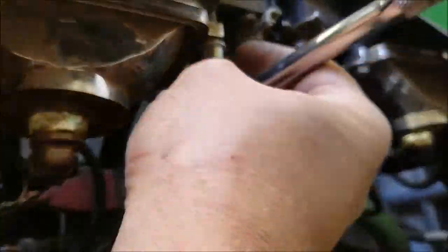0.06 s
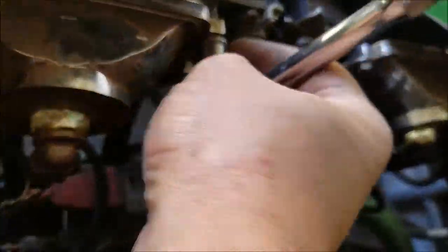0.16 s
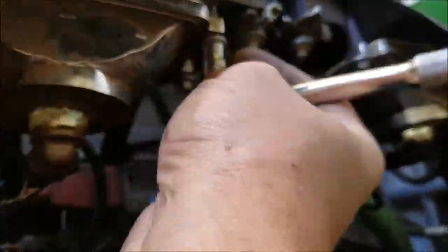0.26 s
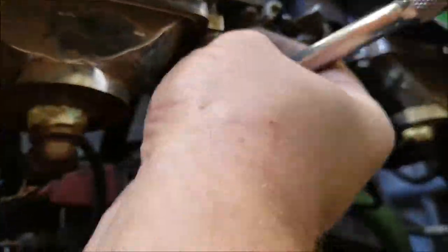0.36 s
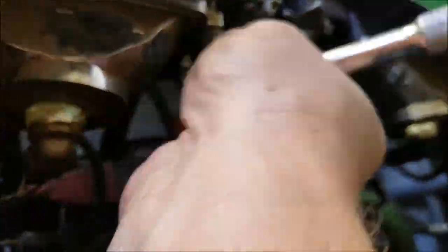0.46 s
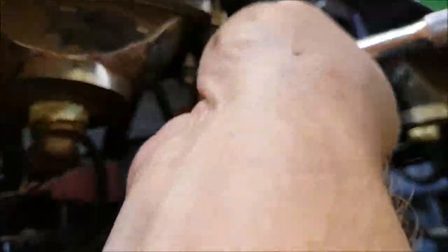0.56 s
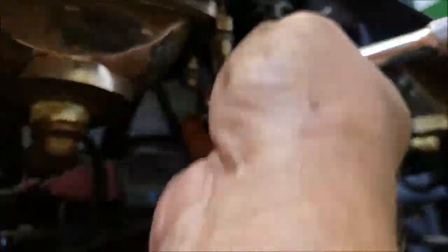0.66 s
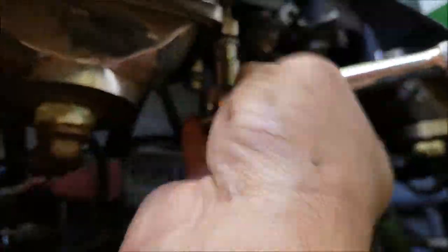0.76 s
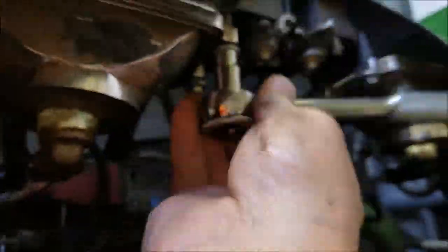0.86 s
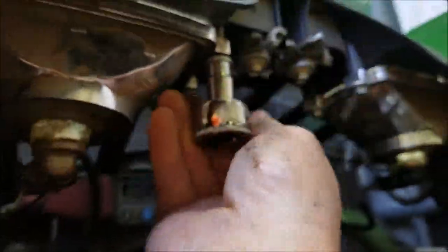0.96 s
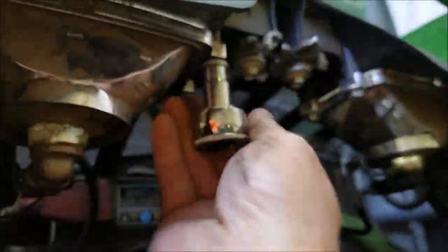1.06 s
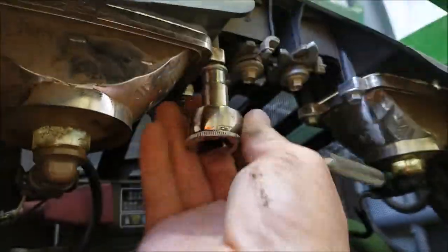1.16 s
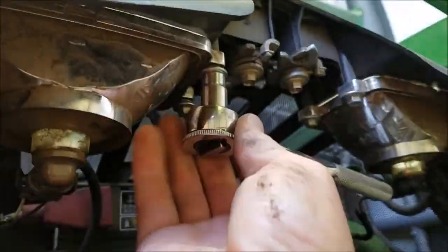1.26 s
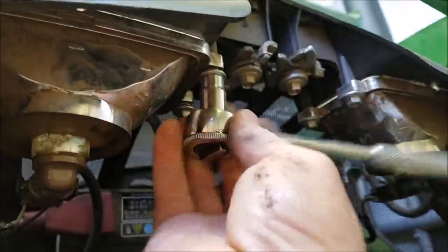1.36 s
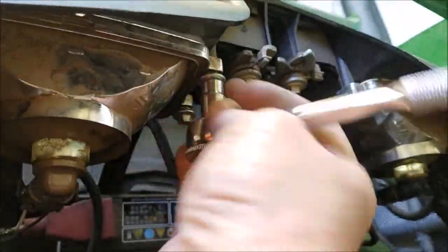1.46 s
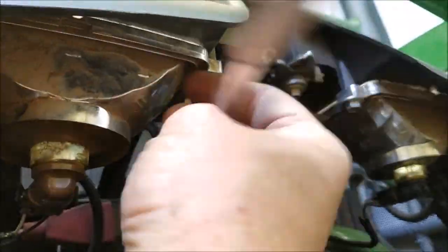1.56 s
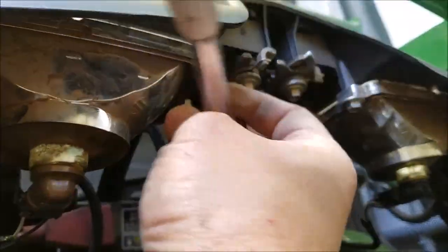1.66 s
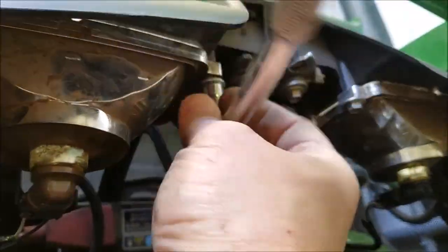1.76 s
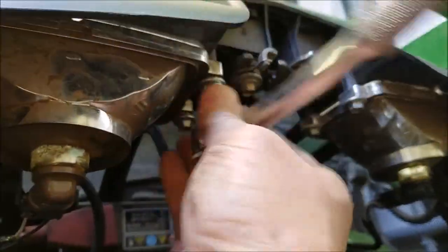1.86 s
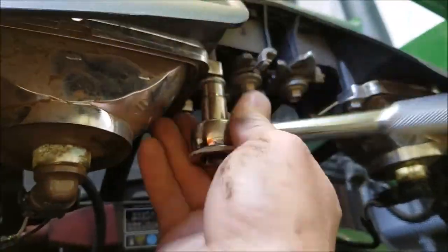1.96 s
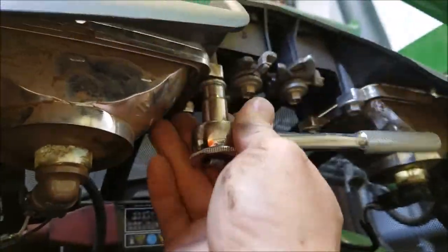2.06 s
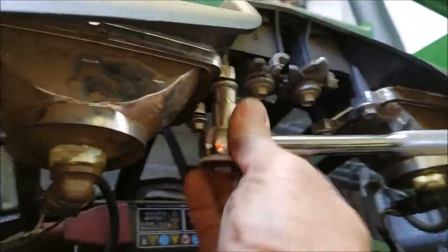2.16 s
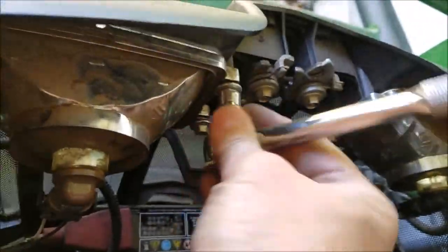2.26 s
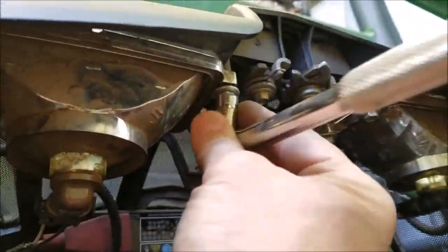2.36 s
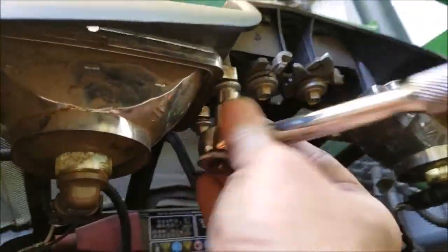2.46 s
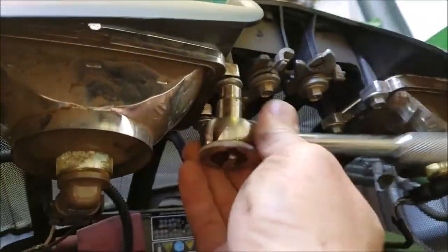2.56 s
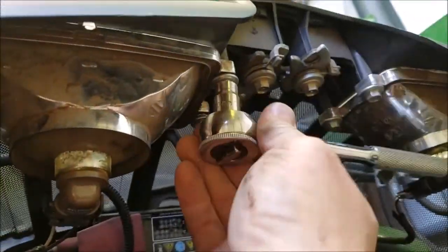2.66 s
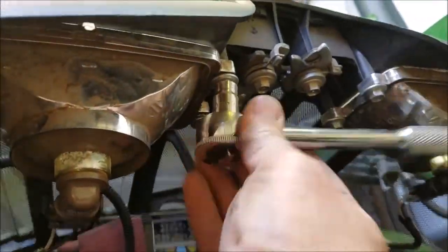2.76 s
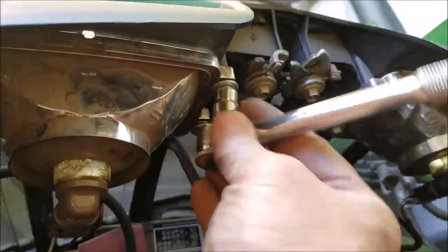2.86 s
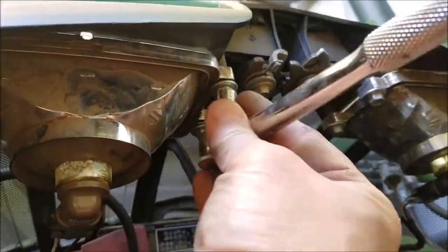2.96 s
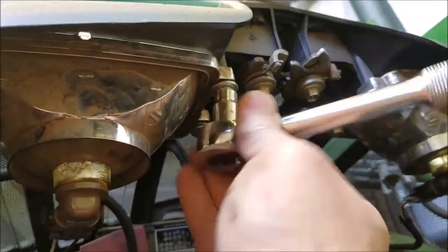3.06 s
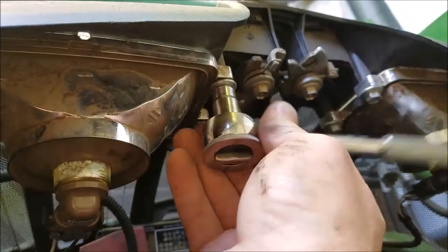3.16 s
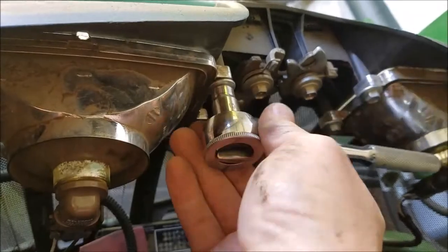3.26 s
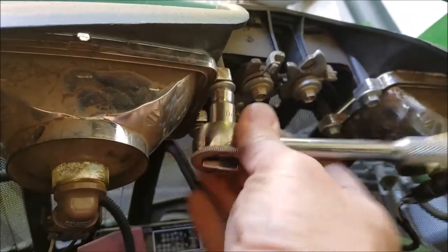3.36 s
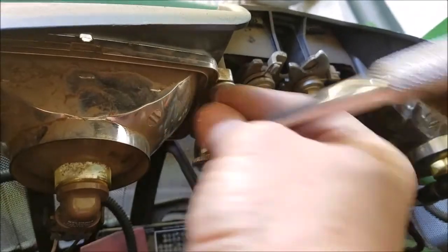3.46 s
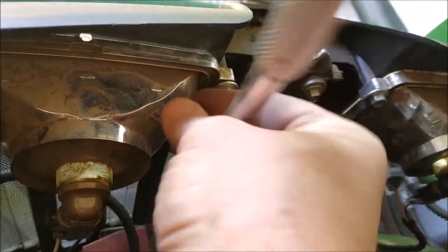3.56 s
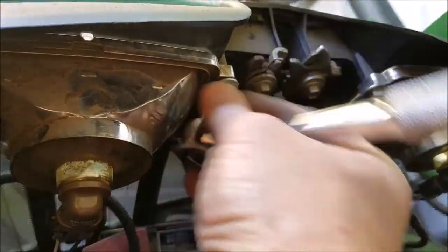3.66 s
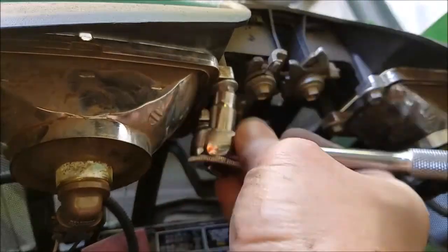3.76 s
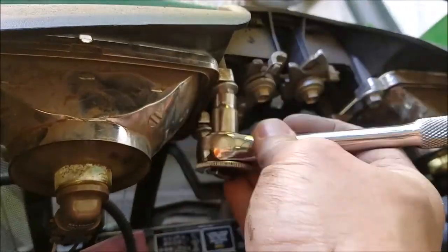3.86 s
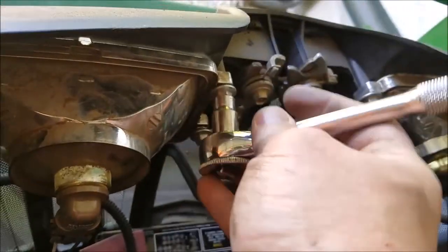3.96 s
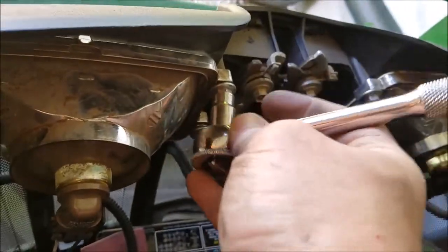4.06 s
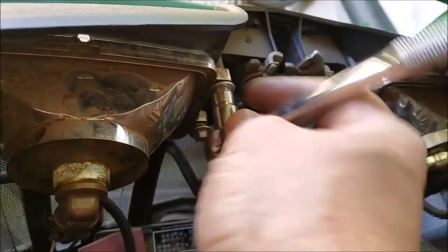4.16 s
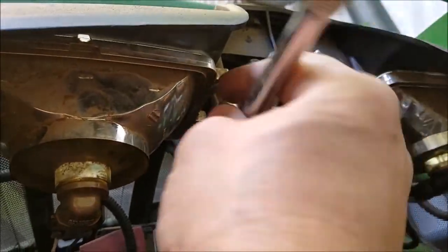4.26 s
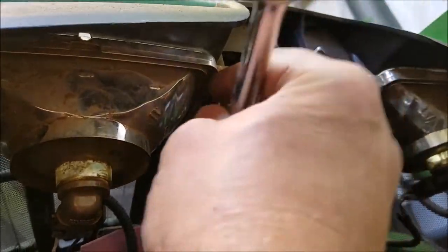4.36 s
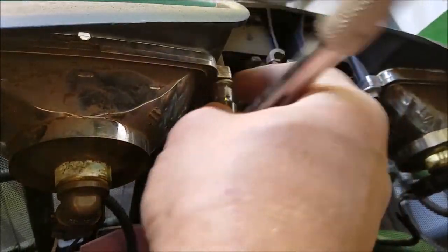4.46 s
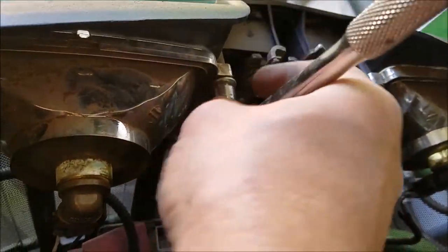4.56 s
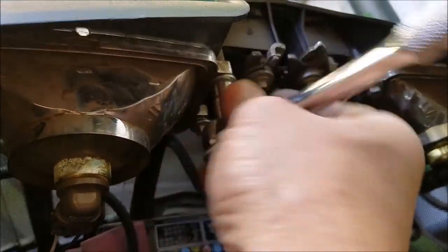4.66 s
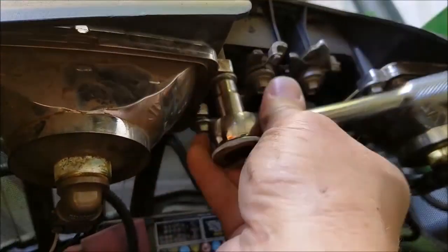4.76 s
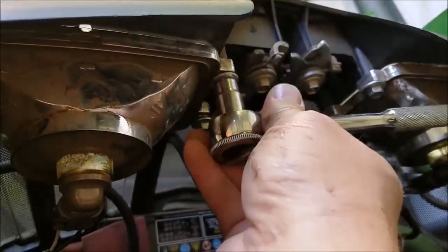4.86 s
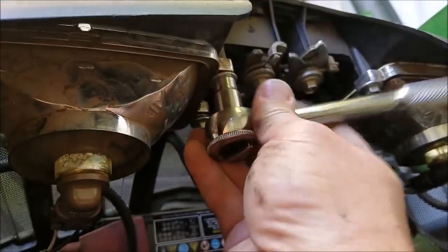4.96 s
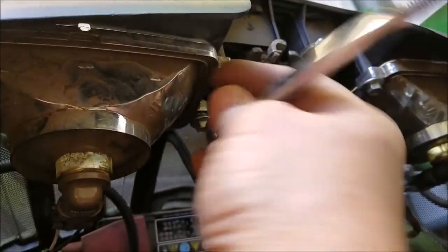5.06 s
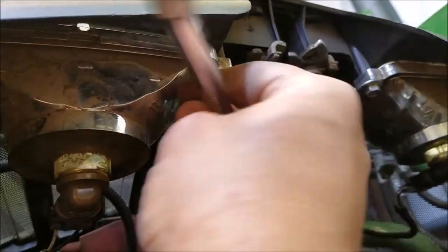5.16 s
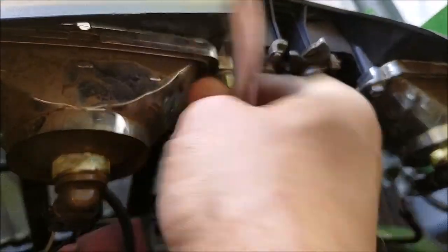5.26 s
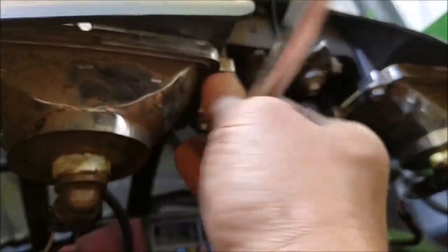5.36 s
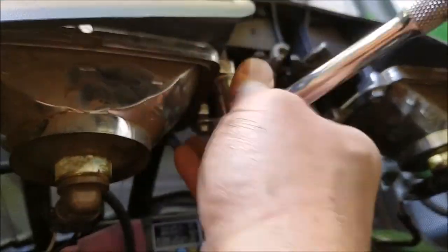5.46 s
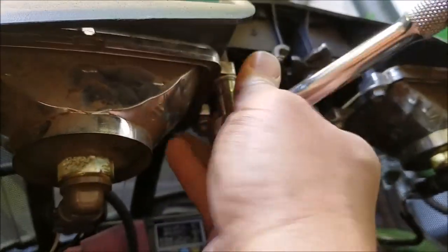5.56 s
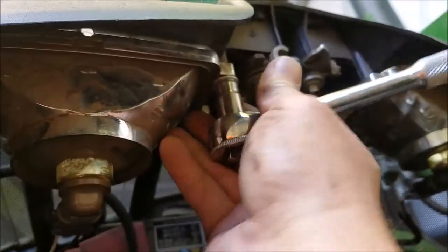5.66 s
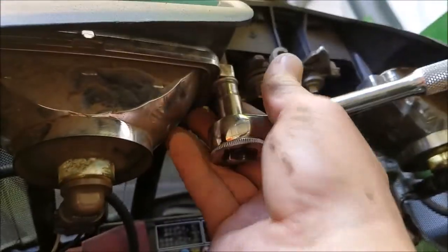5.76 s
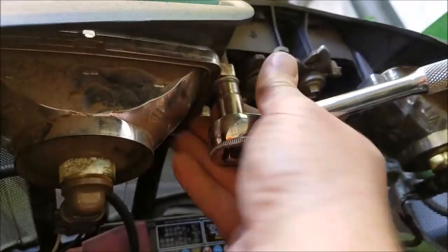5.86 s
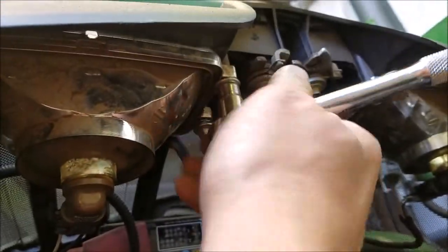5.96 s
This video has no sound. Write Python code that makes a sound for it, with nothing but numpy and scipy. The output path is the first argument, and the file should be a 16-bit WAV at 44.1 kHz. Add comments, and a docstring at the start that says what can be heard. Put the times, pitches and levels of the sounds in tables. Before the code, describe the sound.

A hand ratchet with a socket works on a machine bolt, very close to a stereo microphone in a workshop with short reverberation. Near 0.1 s the tool's slack knocks lightly and skin rubs. Two hard clunks with a low housing thud land at 0.6 and 0.8 s, the second with a short handle ring, followed by a few separate clicks. Six rapid runs of crisp steel clicks, with rattle and chatter, occur at 1.0-1.25, 1.9-2.0, 2.45-2.6, 3.05-3.2, 3.85-3.95 and 4.7-4.9 s; isolated clicks appear around 3.6 and 4 s. Soft knocks and uneven hand slides surround them. A tiny squeak comes at 2.8 s. Low rumble and faint hiss persist; a wavering low motor hum swells from about 2 s and weakens after 3.6 s. After the last run only small knocks and dry rubbing continue to 6 s.

```python
"""A socket ratchet works on a bolt in a machine, close to the microphone in a workshop.
First the slack of the tool knocks and the hand rubs the handle; then the socket clunks onto the bolt, twice.
Six back-swings follow: the pawl drops over the teeth in runs of clicks, each a burst of filtered noise
plus decaying modes. Knocks and hand slides (gliding noise) continue around the runs and after the last.
A motor hum, a wavering sine, swells from about 2 s; the thread squeaks once, before the fourth swing."""
import sys
import numpy as np
from scipy import signal
from scipy.fft import rfft, irfft
from scipy.io import wavfile
from scipy.ndimage import uniform_filter1d

SR = 44100
rng = np.random.default_rng(int(sys.argv[2]) if len(sys.argv) > 2 else 0)


def to_wav(sig):
    """Store sig (one row per channel, or 1-D mono) as 16-bit WAV at the path in sys.argv[1].

    Samples outside -1..1 are clipped; the rate is SR.
    """
    pcm = np.clip(np.atleast_2d(sig), -1, 1) * 32767
    pcm = np.round(pcm).astype(np.int16)
    wavfile.write(sys.argv[1], SR, pcm.T)  # frames by channels


N = 265614
FREQ_HZ = np.fft.rfftfreq(N, 1 / SR)
TIME_S = np.arange(N) / SR

# Spectra of click, shank rattle, machine kick: f/Hz, relative level/dB
STEEL_SPECTRUM = [(2000, -42.5), (5000, -18), (6500, -15.5), (7400, -27.5), (8800, -17), (11000, -12),
                  (13200, -10.5), (15700, -11), (17000, -16)]
SHANK_SPECTRUM = [(700, -23), (2000, -2), (3000, -10), (3550, 2.5), (4500, -2), (5500, -4.5), (7500, -5),
                  (11000, -17.5)]
MACHINE_SPECTRUM = [(60, -9.5), (130, -17), (200, 0), (340, -10.5), (470, 1), (620, -10.5), (1000, -4),
                    (1900, -16), (2600, -5.5), (4000, -27), (8000, -19.5)]
# Resonances of the ratchet head: f/Hz, width/Hz, level above the rest/dB
HEAD_MODES = [(7960, 206, 21.5), (8570, 270, 11.5), (9700, 1400, 10), (12020, 610, 14), (12360, 1700, 6.5),
              (14630, 400, 15.5)]


def pawl():
    """The pawl snaps down at each main click: head rings, shank rattles, socket sings, machine is kicked."""
    s, click_db, *relative_db = clicks_in_order().T
    shank_db, hollow_db, socket_db = click_db + np.array(relative_db)

    # chatter on the flank of the next tooth, weaker where the gap exceeds 20 ms
    gap_s = np.diff(s, append=np.inf)
    place, luck = rng.random((2, len(s)))
    late_s = s + np.minimum(gap_s, 0.016) * (0.3 + 0.5 * place)
    chatter_db = np.minimum(shank_db - click_db + 8, -5) - 6 * luck - 12 * (gap_s > 0.02)

    snap = blows(s, click_db, t60_s=0.029, rise_s=0.0004, repeat=0.15, patchy_db=3.5)
    snap += blows(late_s, click_db + chatter_db, t60_s=0.03, rise_s=0.0004, repeat=0.06, patchy_db=5)
    rattle = blows(s, shank_db - 1.5, t60_s=0.051, rise_s=0.00035, repeat=0.062, patchy_db=5)
    rattle += blows(late_s, shank_db + chatter_db + 3.5, t60_s=0.036, rise_s=0.0004,
                    repeat=0.04, patchy_db=4.5)
    kick = blows(s, shank_db - 4.5, t60_s=0.092, rise_s=0.0014, repeat=0.41, patchy_db=2)
    hollow = ring(s, hollow_db - 1, hz=462, t60_s=0.07, spread=0.035)
    socket = ring(s, socket_db - 2, hz=4125, t60_s=0.042, spread=0.017)

    noise = colour(snap, STEEL_SPECTRUM, HEAD_MODES)
    noise += colour(rattle, SHANK_SPECTRUM)
    noise += colour(kick, MACHINE_SPECTRUM)
    return ports(noise) + hollow + socket * amp([[2.5], [-5]])  # socket: left, right dB


SOCKET_HELD_DB = -18  # socket ring rel. to click under a damping grip, before scatter and trim
# One row a back-swing: start t/s, end t/s, main clicks in the run (with chatter between them),
# ease (slowing at both ends, 0-1), lean (start slower than end),
# limp (every second main click late, share of the pitch),
# click level/dB; rel. to click: shank rattle level/dB, hollow note level/dB, socket ring level/dB;
# freest socket ring t/s. Levels before scatter and the trims in pawl().
BACK_SWINGS = [(1.0307, 1.2503, 21, 0.42, -0.28, 0.1, -16.5, -10.5, -11.5, 3, 1.21),
               (1.8762, 2.0263, 14, 0.17, -0.13, .22, -15.5, -13, -16, -6.5, 1.965),
               (2.4484, 2.618, 15, 0.1, -0.038, 0.08, -15.5, -13, -15.5, -5, 2.61),
               (3.0489, 3.195, 12, .045, .257, .066, -13.5, -10.5, -35, 2, 3.14),
               (3.8436, 3.9448, 9, .22, -.085, .125, -16.5, -14.5, -23, -8, 3.89),
               (4.7012, 4.874, 14, 0.3, -0.049, -.03, -13.5, -12, -26, -6, 4.785)]
# Teeth outside the regular part of a run: some stand alone, some open or close the first back-swing:
# t/s, click level/dB, shank rattle level rel. to click/dB; before the trims in pawl()
OUTER_TEETH = [(0.8082, -17, -5), (0.8377, -16.5, -12.5), (.863, -17.5, -7.5), (0.9719, -17.5, -16.5),
               (1.0154, -19, -10.5), (1.2622, -10.5, -15.5), (1.278, -23.5, -5), (2.0576, -16, -15),
               (3.6233, -20, -7.5), (3.6731, -15, -20), (3.971, -14, -10.5), (3.9959, -13.5, -20.5),
               (4.0662, -18, -13)]


def clicks_in_order():
    """Main clicks of the pawl, inside and outside the regular part of the runs, sorted by time."""
    hollow_db = -24.5  # of the outer teeth, rel. to click, before trim
    outer = [(*row, hollow_db, SOCKET_HELD_DB) for row in OUTER_TEETH]
    rows = np.vstack([swing(*row) for row in BACK_SWINGS] + [outer])
    return rows[np.argsort(rows[:, 0])]


def swing(start_s, end_s, main_clicks, ease, lean, limp, click_db, rattle_db, hollow_db, ring_db, ring_s):
    """Uneven handle speed spaces the main clicks: rows t/s, click dB, rel. rattle, hollow, socket dB."""
    ends_db, click_scatter_db = -0.5, 1.73  # softer clicks at both ends; no two alike
    free_s, ring_scatter_db = 0.047, 2.5  # the grip frees the socket for a moment in each swing
    count = round(main_clicks)
    k = np.arange(count)
    angle = (k + limp * (k % 2) * (k < count - 1)) / (count - 1)
    when = angle + ease * np.sin(2 * np.pi * angle) / (2 * np.pi)
    when += lean * np.sin(np.pi * angle) / np.pi
    s = start_s + (end_s - start_s) * when
    tooth, contact = rng.standard_normal((count, 2)).T
    level_db = click_db + ends_db * (2 * angle - 1) ** 2 + click_scatter_db * tooth
    free = np.exp(-0.5 * ((s - ring_s) / free_s) ** 2)
    socket_db = SOCKET_HELD_DB + (ring_db - SOCKET_HELD_DB) * free + ring_scatter_db * contact
    return np.column_stack(np.broadcast_arrays(s, level_db, rattle_db, hollow_db, socket_db))


# Spectra of the clack (also of the knocks) and of the thud: f/Hz, relative level/dB
CLACK_SPECTRUM = [(350, -27.5), (700, 0), (1200, -4), (1650, 0), (2900, -3), (4200, -9), (6000, -21.5),
                  (16000, -40)]
THUD_SPECTRUM = [(40, -23.5), (100, -16), (180, 1), (290, -6.5), (460, -0.5), (640, -10), (3000, -48)]
# Low modes of the machine under a hard blow: f/Hz, level rel. to thud entry/dB, t60/s
HOUSING_MODES = [(198.3, -9.5, .2), (313, -4.5, 0.087), (368, -1, 0.089), (463.4, 0, 0.068)]
# Socket seats hard on the bolt: t/s, clack level/dB, thud level/dB, snap level/dB,
# handle ring level/dB; before the trims below
SOCKET_CLUNKS = [(0.583, -12.5, -12.5, -9, -45.5), (0.7711, -12.5, -12, -18, -13.5)]


def clunks():
    """The socket lands on the bolt: snap, clack, thud of the housing, short note of the handle."""
    s, clack_db, thud_db, snap_db, ring_db = np.transpose(SOCKET_CLUNKS)
    snap_spectrum = [(1500, -28), (4200, 3), (15500, -1)]
    clack = blows(s, clack_db, t60_s=0.06, rise_s=0.0008, repeat=0.25, patchy_db=3.5)
    thud = blows(s, thud_db - 5, t60_s=0.1, rise_s=0.0026, repeat=0.15, patchy_db=1)
    snap = blows(s, snap_db, t60_s=0.029, rise_s=0.0006, repeat=0.1, patchy_db=1.5)
    noise = colour(clack, CLACK_SPECTRUM) + colour(thud, THUD_SPECTRUM) + colour(snap, snap_spectrum)

    housing = sum(ring(s, thud_db + db, hz, t60_s, spread=0.021, rise_s=0.0018)
                  for hz, db, t60_s in HOUSING_MODES)
    # the housing rocks back 35 ms later
    housing += ring(s + 0.035, thud_db - 14.5, hz=163, t60_s=0.13, spread=0.019, rise_s=0.005)
    handle = ring(s, ring_db, hz=1648, t60_s=0.13, spread=0.003)
    handle += ring(s, ring_db - 2, hz=1936, t60_s=0.08, spread=0.004)
    # handle: left +2 dB, right inverted at half amplitude
    return ports(noise) + housing + handle * amp([[2], [0]]) * [[1], [-0.5]]


# Spectrum of the snap: f/Hz, relative level/dB
SNAP_SPECTRUM = [(1500, -29.5), (4000, 5.5), (6500, -1), (9000, -3), (15500, 1.5)]
# Slack of the tool is taken up: t/s, clack level/dB, thud level rel. to clack/dB,
# snap level rel. to clack/dB; before the trims below
SLACK_KNOCKS = [(0.074, -30, -6, -5), (0.1, -20, -7.5, -21), (0.117, -25.5, -5.5, -7),
                (0.396, -41, -4, -13), (1.363, -34.5, -3, -10), (1.411, -44.5, 4, 11),
                (1.86, -28.5, -6.5, -1), (2.122, -38.5, 4, -23), (2.696, -27, -3.5, 0.5),
                (3.025, -30.5, -2.5, -1.5), (3.288, -30.5, -17.5, -43), (3.365, -51, -2.5, 22),
                (3.4043, -37, 3.5, -22.5), (3.458, -43.5, 2, -19), (3.475, -34.5, -0.5, 8),
                (4.144, -30, -4, -11.5), (4.569, -50.5, -19, 19.5), (4.677, -23.5, -5, -3.5),
                (4.918, -25.5, -8.5, -18.5), (4.953, -37.5, -4, 5), (5.06, -33.5, -6.5, -4),
                (5.098, -51, -15, 21.5), (5.639, -47, -6, 6), (5.692, -28, -4, -31),
                (5.888, -37.5, -1, -22)]


def knocks():
    """Softer blows as the handle changes direction and the socket rocks on the bolt."""
    s, db, thud_db, snap_db = np.transpose(SLACK_KNOCKS)
    clack = blows(s, db - 1.5, t60_s=0.058, rise_s=0.0004, repeat=0.1, patchy_db=2.5)
    thud = blows(s, db + thud_db, t60_s=0.12, rise_s=0.004, repeat=0.05, patchy_db=2.5)
    snap = blows(s, db + snap_db - 6, t60_s=0.04, rise_s=0.0007, repeat=0.14, patchy_db=7)
    noise = colour(clack, CLACK_SPECTRUM) + colour(thud, THUD_SPECTRUM) + colour(snap, SNAP_SPECTRUM)
    return ports(noise)


# Spectra of the skin rub and of dry skin on knurled steel: f/Hz, relative level/dB
SKIN_SPECTRUM = [(60, 3), (170, 10.5), (320, 2.5), (450, 5.5), (700, -0.5), (1500, -1.5), (3500, -16),
                 (6000, -23.5), (9000, -28.5), (15500, -19)]
HISS_SPECTRUM = [(1000, 29), (2800, 3.5), (4500, 3), (7500, -13.5), (12000, -5.5), (16000, -27)]


def rub():
    """Skin and threads slide unevenly, with tiny slips; the colour shifts as the contact moves."""
    slips_per_s, slip_decay_s = 60, 0.0022
    slip_size = amp(4 * np.minimum(rng.exponential(1, N), 2.5))
    slips = (rng.random(N) < slips_per_s / SR) * slip_size
    slips = signal.lfilter([1], [1, -np.exp(-1 / (slip_decay_s * SR))], slips)
    roughness = amp(2 * drift(15)) + 0.61 * unit(slips)
    z = signal.stft(rng.standard_normal((2, N)) * roughness, nperseg=512)[2]

    # level patches, smoothed over frequency, then over time
    patches = uniform_filter1d(rng.standard_normal(z.shape[1:]), size=9, axis=0)
    patches = uniform_filter1d(patches, size=22, axis=1)
    grain = unit(signal.istft(z * amp(3.1 * unit(patches)), nperseg=512)[1][:, :N])
    soft, dry_hiss = handling()
    return ports(colour(grain * soft, SKIN_SPECTRUM) + colour(grain * dry_hiss, HISS_SPECTRUM))


# Hand slides to a new hold: start t/s, end t/s, rub level/dB, dry hiss level rel. to rub/dB
HAND_SLIDES = [(-.03, 0.034, -41, -46), (0.11, 0.293, -49.5, -22), (0.363, 0.523, -63.5, -12),
               (0.854, .99, -64, -19), (1.28, 1.54, -51, -34), (1.589, 1.97, -49, -35),
               (2.044, 2.219, -43.5, -38), (2.325, 2.477, -47.5, -31), (2.59, 2.96, -48, -16),
               (2.957, 3.112, -40.5, -19), (3.15, 3.485, -43.5, -32), (3.536, 3.805, -56, -15),
               (4.03, 4.227, -48.5, -7), (4.35, 4.55, -62.5, -2.5), (4.599, 4.684, -45.5, -38),
               (4.89, 5.027, -40.5, -7.5), (5.02, 5.19, -57, -5), (5.286, 5.48, -61, -1.5),
               (5.589, 5.73, -49.5, -10), (5.879, 5.996, -52.5, -6)]


def handling():
    """Each slide swells and fades in one arch: strength of the rub and of the hiss over time."""
    hold_db, arch_power = -57.5, 0.76  # rub of a hand that only holds on; below 1 = rounder arch
    soft_power, dry_power = np.full(N, amp(hold_db) ** 2), np.zeros(N)
    for start_s, end_s, db, hiss_db in HAND_SLIDES:
        during = (TIME_S > start_s) & (TIME_S < end_s)
        phase = np.pi * (TIME_S[during] - start_s) / (end_s - start_s)
        arch = abs(np.sin(phase)) ** arch_power
        soft_power[during] += (amp(db) * arch) ** 2
        dry_power[during] += (amp(db + hiss_db) * arch) ** 2
    return np.sqrt(soft_power), np.sqrt(dry_power)


def squeak():
    """The thread squeaks once under load: one short, faint decaying tone."""
    return ring([2.773], [-36.5], hz=2190, t60_s=0.043, spread=0.005, rise_s=0.0033)


# Spectrum of rumble and hiss: f/Hz, relative level/dB
AIR_SPECTRUM = [(12, -36), (20, 3.5), (130, 3.5), (228, -15), (446, -23.5), (642, -34.5), (2600, -17),
                (7520, -32), (14700, -30), (16000, -37)]
# Hum of the motor, before its wavering: t/s, level/dB
HUM_LEVEL = [(1.7, -66), (2.3, -49.5), (2.8, -49), (3.6, -49.5), (4.5, -57.5)]


def workshop():
    """Low rumble and faint hiss, with the hum of a distant motor, wavering in pitch and level."""
    noise = rng.standard_normal((2, N)) * amp(drift(3))
    air = unit(ports(colour(noise, AIR_SPECTRUM)))
    hum_hz = 68 + 1.4 * drift(3.5)
    hum_db = np.interp(TIME_S, *np.transpose(HUM_LEVEL)) + 5 * drift(10)
    return amp(-54.5) * air + amp(hum_db) * np.sin(2 * np.pi * np.cumsum(hum_hz) / SR)


# Reverberation of the workshop: f/Hz, t60/s
ROOM_DECAY = [(150, 0.47), (1500, 0.28), (6000, 0.24), (15000, 0.2)]


def room(x):
    """Scattered reflections off the machine and the walls, each band dying at its own speed."""
    build_up_s = 0.0058
    hz, t, z = signal.stft(rng.standard_normal((2, SR // 2)), SR, nperseg=256)
    decay = np.exp(-np.log(1000) * t / read(ROOM_DECAY, hz)[:, None])
    tail = signal.istft(z * decay, SR, nperseg=256)[1]
    tail = tail * (1 - np.exp(-np.arange(tail.shape[1]) / (build_up_s * SR)))
    return signal.fftconvolve(x, tail / np.linalg.norm(tail[0]), axes=1)[:, :N]


# The two microphone ports: f/Hz, left-right level/dB
PORT_BALANCE = [(200, -1), (500, 0.7), (900, 3.5), (2200, 6.5), (3500, 4), (4600, 6.5), (6200, -1.5),
                (9500, -0.5), (11500, -3.5), (14500, -6)]
# Likeness of the two ports: f/Hz, correlation (-1 to 1)
PORT_LIKENESS = [(40, 0.67), (150, 0.98), (450, 0.61), (750, 0.57), (1500, -0.5), (3000, -0.055)]


def ports(x):
    """Mixes two noises to a likeness per frequency; the hand shades mids on one side, treble on the other."""
    a, b = rfft(x)
    alike = np.clip(read(PORT_LIKENESS, FREQ_HZ), -1, 1)
    tilt = amp(read(PORT_BALANCE, FREQ_HZ) / 2)
    left = a * tilt
    right = (alike * a + np.sqrt(1 - alike ** 2) * b) / tilt
    return irfft(np.array([left, right]), N)


def blows(times_s, levels_db, t60_s, rise_s, repeat, patchy_db, size=8192):
    """Each blow is a dense, dying noise: a share repeats, the rest and its colour change with the contact."""
    out, t = np.zeros((2, N)), np.arange(size) / SR
    same, share = rng.standard_normal((2, size)), np.clip(repeat, 0, 1)
    shape = unit((1 - np.exp(-t / rise_s)) * np.exp(-np.log(1000) * t / t60_s))
    shape *= np.sqrt(t60_s * SR / size / np.log(1e6))  # energy grows with t60
    for s, db in zip(times_s, levels_db):
        shake = np.sqrt(share) * same + np.sqrt(1 - share) * rng.standard_normal((2, size))
        patches = signal.resample(rng.standard_normal(size // 128), size // 2 + 1)
        patchy = irfft(rfft(shake) * amp(patchy_db * patches))
        add(out, s, amp(db) * shape * unit(patchy))
    return out


def ring(times_s, levels_db, hz, t60_s, spread, rise_s=0.0013, size=16384):
    """One mode struck at each time; the grip shifts its pitch a little."""
    out, t = np.zeros((1, N)), np.arange(size) / SR
    shape = (1 - np.exp(-t / rise_s)) * np.exp(-np.log(1000) * t / t60_s)
    for s, db, shift in zip(times_s, levels_db, rng.standard_normal(len(times_s))):
        add(out, s, amp(db) * shape * np.sin(2 * np.pi * hz * (1 + spread * shift) * t))
    return out


def colour(x, points, peaks=(), size=4096):
    """Causal minimum-phase filter of unit energy: a broad spectrum with resonances on top."""
    hz = abs(np.fft.fftfreq(size, 1 / SR))
    power = 1 + sum((amp(db) ** 2 - 1) / (1 + (2 * (hz - f) / width) ** 2) ** 2
                    for f, width, db in peaks)
    log_gain = np.log(amp(read(points, hz)) * np.sqrt(abs(power)))
    taps = np.fft.ifft(np.exp(np.conj(signal.hilbert(log_gain)))).real[:size // 2]
    return signal.oaconvolve(x, taps[None] / np.linalg.norm(taps), axes=1)[:, :N]


def drift(rate_hz):
    """Slow random wander of unit RMS."""
    return unit(irfft(rfft(rng.standard_normal(N)) * np.exp(-(FREQ_HZ / rate_hz) ** 2), N))


def amp(db):
    """Decibels to amplitude."""
    return 10 ** (np.asarray(db) / 20)


def unit(x):
    """Scales to unit RMS."""
    return x / np.sqrt(np.mean(x ** 2) + 1e-20)


def read(points, hz):
    """Interpolates a table over log frequency."""
    f, value = np.transpose(points)
    return np.interp(np.log(hz + 1), np.log(f + 1), value)


def add(mix, s, sound):
    """Adds a sound to the mix from time s, cut at the end."""
    part = mix[:, max(round(s * SR), 0):][:, :sound.shape[-1]]
    part += sound[..., :part.shape[1]]


def scene():
    """Clicks and bumps, direct and through the room, over squeak, rub and workshop."""
    clicks, bumps = pawl(), clunks() + knocks()
    reflections = room(amp(-15.5) * clicks + amp(-14.5) * bumps)
    return clicks + bumps + reflections + squeak() + rub() + workshop()


def record(dry):
    """Band limit: linear-phase low-pass."""
    edge_hz = 15850
    taps = signal.firwin(401, edge_hz, window=("kaiser", 8), fs=SR)
    return signal.oaconvolve(dry, taps[None], "same")


dry = scene()
out = record(dry)
to_wav(out)
```